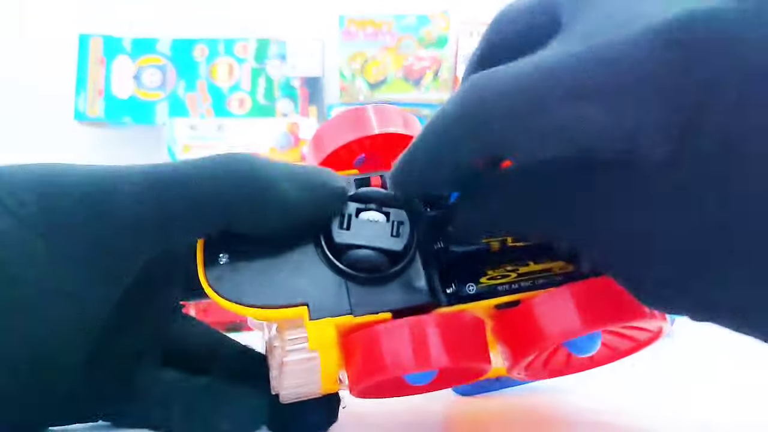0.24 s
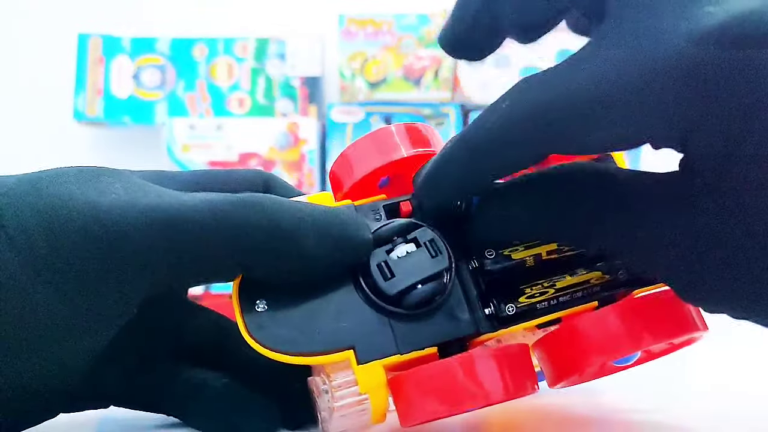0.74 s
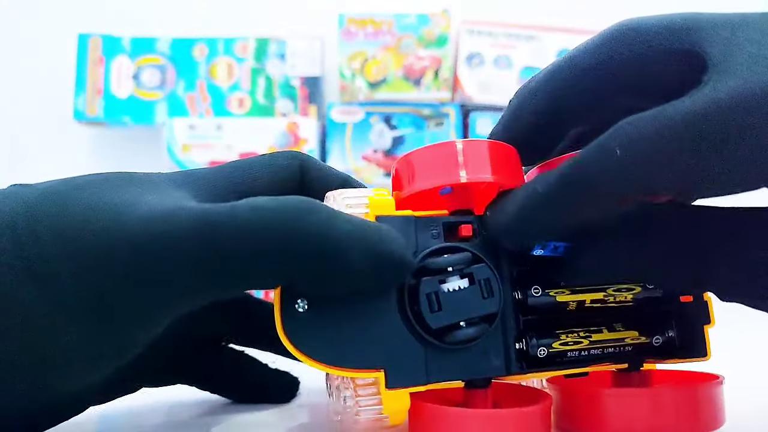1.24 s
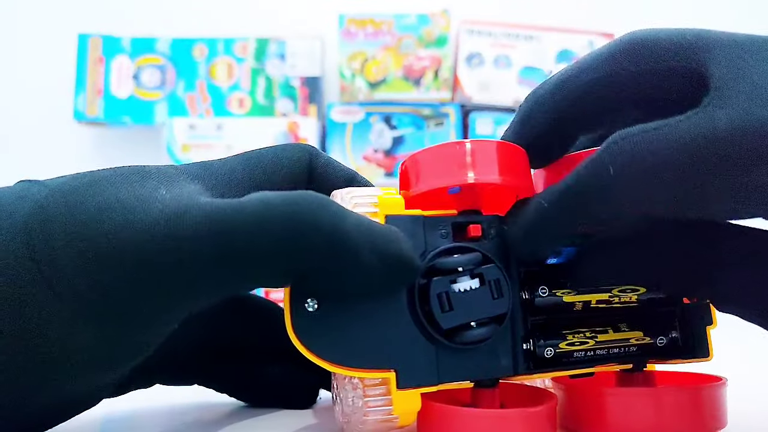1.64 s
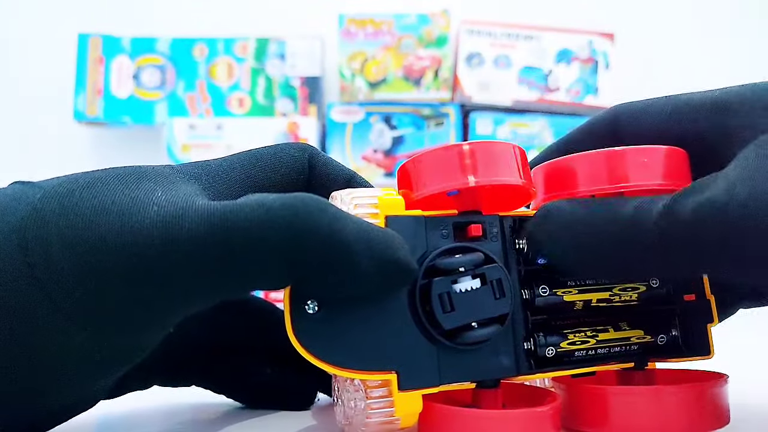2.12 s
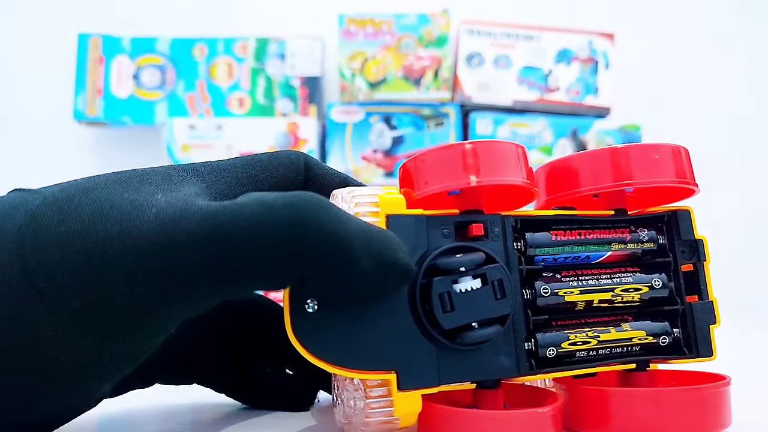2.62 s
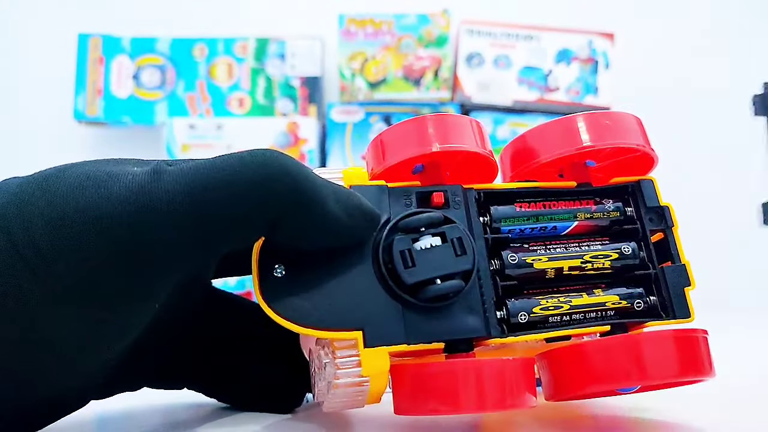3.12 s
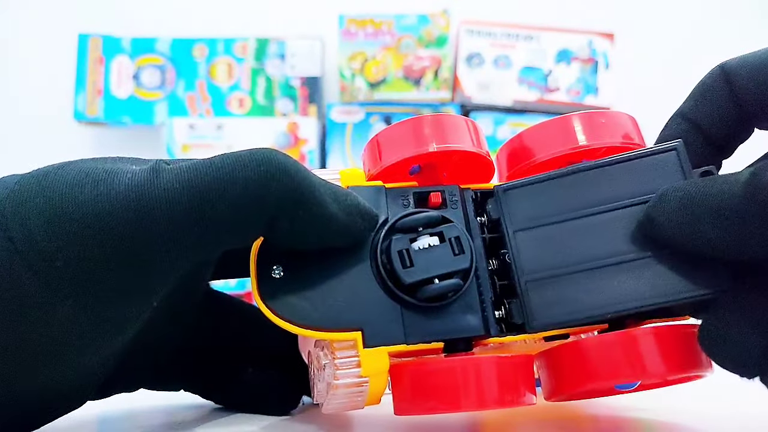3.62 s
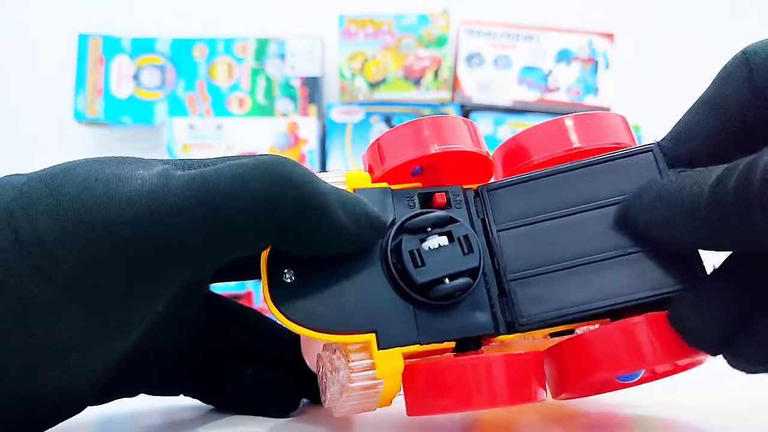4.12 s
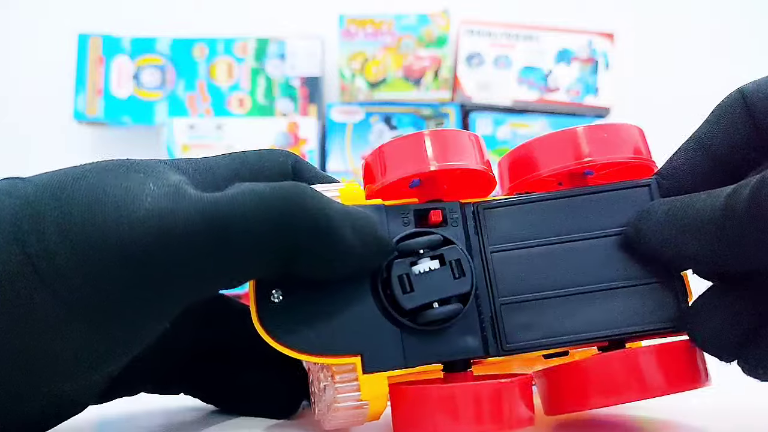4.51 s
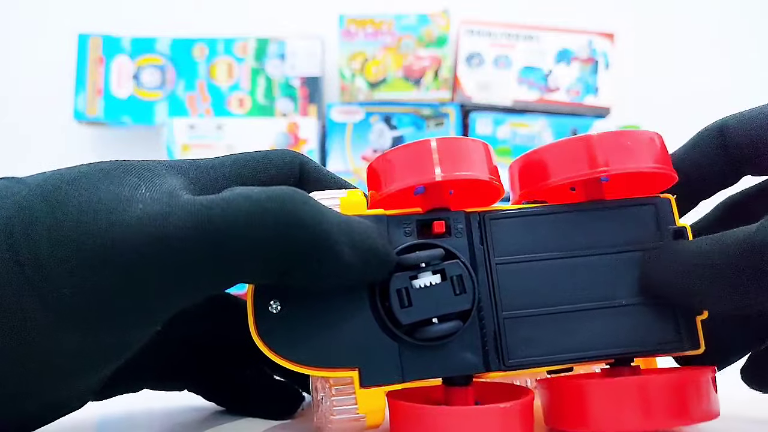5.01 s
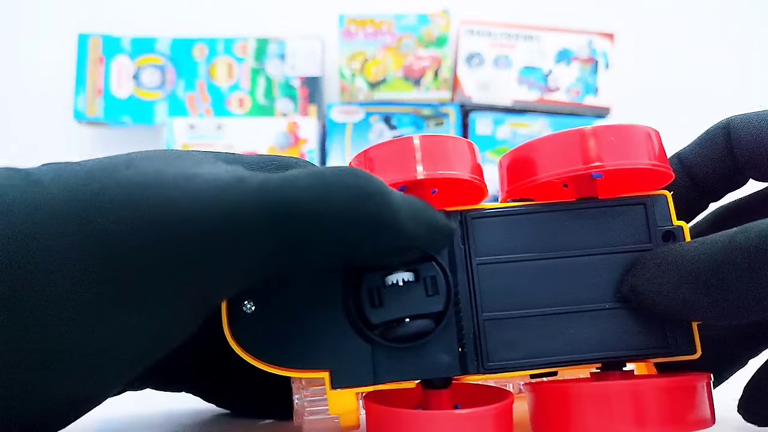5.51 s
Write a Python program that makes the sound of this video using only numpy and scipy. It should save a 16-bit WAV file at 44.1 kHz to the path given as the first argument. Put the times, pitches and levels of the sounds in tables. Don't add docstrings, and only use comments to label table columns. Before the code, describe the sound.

Close stereo sound of gloved hands fitting a battery into a hollow plastic toy, over quiet hiss and a faint wavering low hum. Soft fabric rubbing and lumpy low air puffs run throughout. A small clip click comes at 0.2 s, then a clattering knock with a low table thud at 0.72. Hollow knocks follow at 1.6, a bright metallic tick at 1.76 and another knock at 1.9. At 2.27 the battery seats with a very loud, bright, slightly clipped snap and a low thud. Duller clicks come around 2.5 and a crisp double click with a bump at 2.8. After a near pause, light cover taps begin at 3.5; a short gritty squeak slides around 4.2 and ends in a drop-in knock at 4.3. Small taps and a click at 4.7 lead to a loud, sharp latch snap at 5.15, with short room echo. Faint taps and rustle end it by 5.8.

```python
import sys
import numpy as np
from scipy import signal
from scipy.fft import rfft, irfft, next_fast_len
from scipy.io import wavfile
from scipy.ndimage import uniform_filter1d

SR = 44100
rng = np.random.default_rng(int(sys.argv[2]) if len(sys.argv) > 2 else 0)


def amplitude_ratio(level_db):
    exponent = np.asarray(level_db, float) / 20
    return 10 ** exponent


def to_wav(sig):
    pcm = np.clip(np.atleast_2d(sig), -1, 1) * 32767
    pcm = np.round(pcm).astype(np.int16)
    wavfile.write(sys.argv[1], SR, pcm.T)


N = 253737


def evened(x):
    return x / np.sqrt(np.mean(x ** 2) + 1e-20)


def read_curve(points, hz):
    f, value = np.transpose(points)
    return np.interp(np.log(hz + 1), np.log(f + 1), value)


def add(mix, s, sound):
    part = mix[:, round(s * SR):][:, :sound.shape[1]]
    part += sound[:, :part.shape[1]]


def band(x, lo_hz, hi_hz, order=2):
    sos = signal.butter(order, [lo_hz, min(hi_hz, .45 * SR)], "band", fs=SR, output="sos")
    return signal.sosfilt(sos, x)


def passes(hz, lo_hz, hi_hz):
    return 1 / np.sqrt(1 + ((hz ** 2 - lo_hz * hi_hz) / ((hz + 1) * (hi_hz - lo_hz))) ** 4)


def noise(spectrum, same, patchy_db):
    frames, hz = N // 256 + 5, np.fft.rfftfreq(1024, 1 / SR)
    a, b, c, d, patches = rng.standard_normal((frames, 513, 5)).T
    patches = uniform_filter1d(patches, size=14, axis=0)
    patches = evened(uniform_filter1d(patches, size=8, axis=1))
    same = np.clip(read_curve(same, hz), -1, 1)[:, None]
    left = a + 1j * b
    right = same * left + np.sqrt(1 - same ** 2) * (c + 1j * d)
    z = np.array([left, right]) * amplitude_ratio(read_curve(spectrum, hz)[:, None] + patchy_db * patches)
    return evened(signal.istft(z, nperseg=1024, noverlap=768)[1][:, :N])


def swell(s, rise_s, fall_s):
    since = np.arange(0, N / SR + .002, .001) - s
    return amplitude_ratio(10 * np.where(since < 0, since / abs(rise_s), -since / abs(fall_s)))


def piled(levels_db, shapes, rest_db):
    power = amplitude_ratio(rest_db) ** 2 + sum((amplitude_ratio(db) * shape) ** 2 for db, shape in zip(levels_db, shapes))
    return np.interp(np.arange(N) / SR * 1000, np.arange(len(power)), np.sqrt(power))


def room_tone():
    # (frequency [Hz], level per Hz [dB])
    hiss_colour = [(76, -28.5), (130, -19.5), (155, -24), (250, -16), (437, -10), (522, -14.5), (1650, -25),
                   (2100, -32.5), (3250, -36), (6910, -43.5), (9130, -45.5), (13900, -41), (15000, -56.5)]
    # (frequency [Hz], likeness [0-1])
    hiss_likeness = [(60, 0.22), (240, 1), (950, 0.12), (3770, 0.05), (15000, 0.02)]
    hum_hz, hum_db, waver = 100, -48, 0.38
    blur = evened(band(rng.standard_normal(N), hum_hz - 11, hum_hz + 11))
    hum = np.sqrt(2) * np.sin(2 * np.pi * hum_hz * np.arange(N) / SR) + waver * blur
    hiss = amplitude_ratio(-57) * noise(hiss_colour, hiss_likeness, patchy_db=3.0)
    return hiss + amplitude_ratio(hum_db + np.array([[-1.5], [-.4]])) * hum


def air():
    # (time [s], level [dB], time to fade 10 dB [s], left-right [dB])
    gust_rows = [(0.0, -33.5, 0.2622, -11), (.19, -37.5, 0.1051, -12.5), (.36, -38, 0.0398, -14.5),
                 (.8, -39, 0.42, 1.5), (1.06, -40, 0.16, -7), (1.26, -32.5, 0.27, -4.5),
                 (1.46, -35.5, -0.0122, -19.5), (1.62, -37, 0.17, -7), (1.71, -39, 0.0241, -22),
                 (1.819, -30, 0.01, -20), (2.071, -37.5, 0.1759, -12.5), (2.18, -43, 0.6, 1),
                 (2.43, -42, 0.1, -6.5), (2.67, -37, 0.18, -11.5), (2.8, -43, 0.3, 6),
                 (2.98, -42.5, 0.3, -4.5), (3.31, -40, 0.2322, -7.5), (3.46, -47, 0.329, -8),
                 (3.65, -34, 0.12, -19), (3.94, -35, 0.16, -12.5), (4.159, -37.5, -0.1, -22.5),
                 (4.36, -40, 0.14, -12.5), (4.79, -41, 0.32, 0), (5.3, -43, 1.5, 2)]
    # (time [s], level [dB], time to fade 10 dB [s])
    jolt_rows = [
        (.74, -23, 0.08),
        (1.75, -34.5, -3),
        (2.48, -28.5, -0.57),
        (2.811, -14.5, -0.03),
        (4.14, -29, -0.12),
        (4.31, -39.5, 1),
        (5.11, -34, -0.4),
    ]
    shapes = [swell(s, 0.7 * fade_s, fade_s) for s, _, fade_s, _ in gust_rows]
    gusts = np.array([piled([db + side * pan_db for _, db, _, pan_db in gust_rows], shapes, -54.5)
                      for side in (.5, -.5)])
    jolt_shapes = [swell(s, 0.012, fade_s) for s, _, fade_s in jolt_rows]
    jolts = piled([db for _, db, _ in jolt_rows], jolt_shapes, -59.5)
    a, b, lumps = rng.standard_normal((3, N))
    lumpy = amplitude_ratio(3.777 * evened(band(lumps, 8.1, 58, order=1)))
    push = np.array([0.27 * b + a, b]) * lumpy
    low = np.array([evened(band(push[0], 3.8, 59.0)), evened(band(push[1], 21, 65.7))])
    upper = amplitude_ratio(-16.5) * evened(band(push, 51.0, 223))
    return amplitude_ratio(-4.0) * (gusts * low + (amplitude_ratio(-26.5) * gusts + jolts) * upper)


def gloves():
    # (most pressure [s], rise [s], fall [s],
    # rub [dB], fizz [dB])
    strokes = [(0.0, 0.0499, 0.326, -56.5, -68), (.227, 0.0323, 0.071, -46.5, -80.5),
               (.476, 0.0983, 0.042, -54, -67.5), (.672, .03, .04, -60, -59),
               (.701, 0.051, 0.2, -46, -56.5), (.93, 0.107, 0.095, -54, -67),
               (1.31, 0.2012, 0.084, -53.5, -63), (1.5, 0.024, 0.3053, -53.5, -70.5),
               (1.898, 0.2198, 0.109, -53.5, -58.5), (2.113, 0.1742, 0.19, -57, -63.5),
               (2.377, 0.2068, 0.167, -44.5, -57.5), (2.575, 0.2341, 0.041, -49.5, -55),
               (2.606, 0.062, .01, -52.5, -53), (2.821, 0.0273, 0.12, -46.5, -52),
               (2.955, 0.117, .02, -59.5, -59.5),
               (3.265, 0.089, 0.047, -68, -64), (3.455, 0.0296, 0.033, -67.5, -67.5),
               (3.549, 0.0365, 0.05, -51.5, -67.5), (3.639, 0.058, 0.024, -50, -66),
               (3.844, 0.0982, 0.02604, -50.5, -67.5), (4.173, 0.04306, 0.0533, -45.5, -50),
               (4.328, 0.03, 0.035, -45.5, -64.5), (4.447, 0.022, 0.047, -51, -73),
               (4.717, 0.136, 0.041, -50.5, -65), (4.901, 0.096, 0.11, -47.5, -65),
               (5.081, 0.16, 0.043, -54, -56), (5.261, 0.1963, 0.139, -47.5, -59.5),
               (5.49, 0.092, 0.094, -55, -64.5), (5.73, 0.25, 0.202, -59, -66.5)]
    # (frequency [Hz], level per Hz [dB])
    rub_colour = [(240, -39), (400, 0.5), (615, -0.5), (990, -2.5), (1650, -13.5), (1950, -2), (2560, -17),
                  (6000, -32.5), (7800, -57.5), (13200, -120)]
    # (frequency [Hz], level per Hz [dB])
    fizz_colour = [(1470, -31.5), (2500, 0), (4450, -3), (4980, -5), (7190, -2.5), (8810, -11), (13700, -9),
                   (14700, -34), (15000, -48.5)]
    s, rise_s, fall_s, rub_db, fizz_db = np.transpose(strokes)
    shapes = [swell(*row) for row in zip(s, rise_s, fall_s)]
    grain = amplitude_ratio(1.5 * evened(uniform_filter1d(rng.standard_normal(N), size=130)))
    rub = piled(rub_db, shapes, -72) * noise(rub_colour, [(400, 0.7), (4000, 0.56)], patchy_db=0.2)
    fizz = piled(fizz_db, shapes, -74.5) * noise(fizz_colour, [(3000, 0.15), (12000, 0.11)], patchy_db=3.5)
    return grain * (amplitude_ratio(-6.0) * rub + amplitude_ratio(0.5) * fizz)


def puffs():
    # (time [s], level [dB], half-width [s])
    puff_rows = [
        (0.077, -16, 0.00266),
        (1.275, -18, 0.005406),
        (1.708, -15.5, 0.0026),
        (3.685, -16, 0.0023),
        (3.735, -24, 0.00105),
        (3.837, -15.5, 0.00356),
        (4.135, -22.5, 0.0038),
    ]
    out, t = np.zeros((2, N)), np.arange(-1500, 1500) / SR
    for s, db, half_s in puff_rows:
        push = np.exp(-(t / half_s) ** 2) - 0.29 * np.exp(-(t / (2.5 * half_s)) ** 2)
        add(out, s + t[0], amplitude_ratio(db + np.array([[-14], [0]])) * push)
    return out


def knock(modes, chatter_s, build_s, crack_db, tick_db, spread, flip_hz=0):
    # (frequency [Hz], level per Hz [dB])
    contact_colour = [(1180, -30), (2000, 5), (2320, 2), (4180, -4.5), (4440, -5), (4980, -7), (7070, -3),
                      (8200, -11), (9600, -19), (11000, -13), (12900, -11.5), (14300, -15.5), (15000, -34)]
    t = np.arange(2048) / SR
    since = t - t[265]
    hz, db, t60, pan_db = np.transpose(modes)[:, :, None]
    apart = rng.uniform(-np.pi, np.pi, (len(modes), 1)) * np.clip(hz / 2200, 0, 1) * spread
    shared, *grit = rng.standard_normal((3, 2048))
    force = shared * np.exp(np.where(since < 0, since / (build_s + 1e-7), -since / (chatter_s + 1e-7)))

    growth = (1 - np.exp(-t * hz / 0.27)) ** 2
    ringing = growth * amplitude_ratio(-60 * t / t60) * np.exp(2j * np.pi * hz * t)
    driven = signal.fftconvolve(ringing, force[None], axes=1)[:, :2048]
    driven *= amplitude_ratio(db) / abs(driven).max(axis=1, keepdims=True)
    driven *= np.where(hz < flip_hz, -1, 1)
    rings = np.array([(driven * np.exp(1j * side * apart) * amplitude_ratio(-side * pan_db)).imag.sum(0)
                      for side in (-.5, .5)])
    rings = band(rings, 441.5, 17000, order=3)

    bins = np.fft.rfftfreq(2048, 1 / SR)
    grit = rfft(np.array(grit)) * amplitude_ratio(read_curve(contact_colour, bins))
    fade = -since / (0.54 * chatter_s + 0.0013)
    linger = np.exp(np.where(since < 0, since / (build_s + 0.00016), fade))
    crack = amplitude_ratio(crack_db + 2.5) * evened(irfft(grit * passes(bins, lo_hz=2400, hi_hz=6150)))
    tick = amplitude_ratio(tick_db + 4.5) * evened(irfft(grit * passes(bins, lo_hz=6000, hi_hz=14020)))
    return rings / abs(rings).max() + linger * (crack + tick)


def knocks(touches):
    # (frequency [Hz], level [dB], time to fade 60 dB [s])
    shell_rings = [(549.35, -13, 0.019), (700, -11.5, 0.0099), (920, -1.5, 0.013), (1300, -2.5, 0.015),
                   (1560, -1.5, 0.0025), (2100, -8, 0.025), (2590, -11, 0.013)]
    out = np.zeros((2, N))
    for s, db, hz, crack_db, tick_db, chatter_s, ring_s, shell_db, wide_db in touches:
        shift, uneven, pan = rng.uniform(-1, 1, (3, len(shell_rings)))
        modes = [(hz, 0, ring_s, 0)]
        for (f, d, t60), a, b, p in zip(shell_rings, shift, uneven, pan):
            ring_db = d + 1.2 * b + shell_db - 4.5 * abs(np.log2(f / hz))
            modes.append((f * (1 + 0.083 * a), ring_db, t60, 3.6 * p))
        sound = knock(modes, chatter_s, 0.12 * chatter_s, crack_db, tick_db, spread=0.75)
        add(out, s - .0055, amplitude_ratio(db + wide_db * pan[0] * np.array([[1], [-1]])) * sound)
    return out


def taps():
    # (time [s], peak [dB], strongest ring [Hz], crack [dB])
    nudges = [(.077, -41, 1374, -27), (.682, -39, 980, -16), (.738, -33.5, 1420, -17),
              (.918, -35, 700, -12), (1.149, -45.5, 1010, -26), (1.27, -52.5, 962.8, -18.5),
              (1.64, -39, 902.4, -25.5), (2.129, -35, 951.7, -37.5), (2.246, -33, 1110, -34),
              (2.921, -45.5, 1500, -3.5), (3.451, -44.5, 682, -18), (3.525, -50, 803, -13.5),
              (3.636, -40.5, 850, -16.5), (4.311, -40.5, 1300, -16.5), (4.672, -42, 899.1, -14),
              (4.919, -34, 924, -33.5)]
    # (time [s], peak [dB], strongest ring [Hz], crack [dB], tick [dB])
    heavy = [
        (0.724, -28, 523.4, -15, -15.5),
        (2.039, -38.5, 3334, -13.5, -15),
        (2.208, -35.5, 707.3, -9.5, -24),
        (4.326, -29.5, 990, -20, -30),
        (5.027, -39, 785.4, -12.5, -20.5),
        (5.076, -36.5, 932.1, -11, -28.5),
        (5.559, -37, 1050, -38.5, -33),
    ]
    # (time [s], peak [dB], strongest ring [Hz], crack [dB], tick [dB])
    battery_taps = [(1.328, -36, 1044, -25.5, -25.5), (1.484, -49, 833.8, -4.5, -12),
                    (1.506, -45, 874.4, -10, -14), (1.874, -46, 1500, -2, -19.5),
                    (2.187, -29, 1820, -25, -32), (2.442, -33.5, 1080, -15, -28.5),
                    (2.571, -36.5, 1035, -8, -6), (2.824, -36, 641.7, -17, -27.5)]
    # (time [s], peak [dB], strongest ring [Hz], crack [dB], tick [dB])
    cover_taps = [(3.744, -41, 2241, -15.5, -37), (3.808, -39, 866.5, -33, -42.5),
                  (3.985, -49, 980.4, -4, -8), (4.446, -41, 1300, -15, -21), (4.759, -40, 836, -27.5, -33),
                  (4.829, -43.5, 1304, -9.5, -11.5), (4.883, -41, 1915, -9, -17),
                  (4.905, -33.5, 1931, -15, -16), (4.955, -41, 923.8, -22, -22),
                  (5.428, -38.5, 730, -18.5, -20)]
    # (time [s], peak [dB], strongest ring [Hz], crack [dB])
    catches = [
        (5.151, -19.5, 2100, -15),
        (2.2688, -26, 1300, -11.5),
        (4.33, -32.5, 713.86, -20),
    ]
    # (time [s], peak [dB], strongest ring [Hz], crack [dB])
    wheels = [
        (5.691, -47, 1158, -35.5),
        (5.72, -46.5, 1300, -28),
    ]
    rows = []
    for table, chatter_s in ((battery_taps, 0.0019), (cover_taps, 0.0012), (heavy, 0.0023)):
        rows += [(*row, chatter_s) for row in table]
    for table, chatter_s in ((nudges, 0.0076), (wheels, 0.029), (catches, 0.0063)):
        rows += [(*row, row[-1] - 12.5, chatter_s) for row in table]
    return [(*row, 0.0099 + 1.9 * row[-1], 2.5, 4.5) for row in rows]


def blows():
    # (time [s], peak [dB], ring [Hz], time to fade 60 dB [s], crack [dB])
    shell_blows = [(.7191, -16.5, 2070, 0.0042, -11.5), (.7215, -16.5, 1360, 0.03, -20),
                   (.7305, -25.5, 835, 0.022, -16), (1.6033, -22, 2100, 0.01, -15),
                   (1.6202, -24.5, 1190, 0.01236, -26), (1.649, -19.5, 1458, 0.0117, -19),
                   (1.8885, -24, 939, 0.04, -19.5), (2.476, -24.5, 942.8, 0.02436, -18),
                   (2.516, -23, 945, 0.02378, -11), (3.5362, -30, 1393, 0.035, -28),
                   (3.5392, -28.5, 1384, 0.03264, -26), (3.542, -29.5, 890, 0.031, -28),
                   (4.1842, -33, 1918, 0.0195, -26), (4.2006, -28, 2423, 0.007, -19),
                   (4.2046, -25.5, 1977, 0.022, -23), (4.7045, -32.5, 908, .015, -26),
                   (4.7105, -29.5, 940.5, 0.03, -24.5), (4.7252, -28, 1500, 0.011, -26.5),
                   (5.1715, -27, 680, 0.04714, -36.5), (5.231, -34.5, 675.5, 0.0508, -36)]
    # (time [s], peak [dB], ring [Hz], time to fade 60 dB [s], crack [dB])
    pings = [
        (1.7603, -16.5, 1440, 0.013, -24),
        (1.7606, -27, 3600, .011, -22),
        (1.7605, -24, 5400, .011, -20),
        (2.2708, -13, 1300, 0.01068, -14),
    ]
    # (time [s], peak [dB], ring [Hz], time to fade 60 dB [s], crack [dB])
    clips = [(2.4797, -28, 4200, .004, -8), (4.703, -33.5, 2600, .01, -12),
             (4.7075, -21.5, 4900, .006, -19), (.2155, -30, 2400, 0.0128, -12),
             (.216, -34, 7360, .008, -19), (.2175, -30, 1049, .045, -26), (.7145, -37, 5150, .008, -8),
             (.7245, -23.5, 1600, .025, -14), (2.787, -38.5, 2550, .012, -7.5),
             (2.797, -40, 2600, 0.022, -18), (2.8092, -25, 4250, .005, -5.5),
             (2.8105, -28, 1700, 0.0094, -11.5), (2.812, -28.5, 749, 0.016, -12.5),
             (2.822, -30.5, 4000, .006, -6.5), (2.823, -33, 2700, .012, -14.5),
             (3.5443, -29.5, 1700, .008, -23.5), (4.172, -32, 2500, .015, -15.5),
             (4.194, -30, 2290, .012, -18), (5.4278, -33.5, 2300, .012, -18.5)]
    rows = []
    for table, tick_db in ((shell_blows, -10.5), (pings, 1), (clips, -9)):
        for s, db, hz, ring_s, crack_db in table:
            rows.append((s, db, hz, crack_db, crack_db + tick_db, .0004, ring_s, -1.5, 1.5))
    return rows


def rattles():
    # (time [s], peak [dB], ring [Hz], time to fade 60 dB [s], crack [dB])
    rattle_rows = [(.7195, -28, 2730, .012, -16), (.7218, -23, 2110, 0.023, -20),
                   (.722, -25, 1060, 0.0287, -26), (.733, -35.5, 3900, .015, -15),
                   (.762, -36, 1920, .02, -20), (1.6036, -24, 2976, 0.0084, -21),
                   (1.6031, -23, 1400, .012, -27), (1.6205, -30, 1450, .016, -25.5),
                   (1.6206, -37, 2100, .016, -19), (1.6492, -23, 1800, .013, -14),
                   (1.6496, -33, 6000, .008, -14), (1.7604, -29, 10500, .006, -18),
                   (2.0395, -42, 3350, .05, -20), (4.2224, -41, 2500, .008, -13.5),
                   (4.3232, -21, 1366, 0.016, -19.5), (4.354, -47, 2300, .01, -14),
                   (4.434, -46, 2400, .012, -9), (4.4895, -45.5, 2500, .012, -15),
                   (4.56, -56.5, 5500, 0.0056, -7), (4.6517, -43.5, 2210, .015, -14),
                   (4.6725, -41, 2600, .012, -14), (4.77, -49, 2500, 0.014, -20),
                   (4.935, -47, 2200, .01, -13.5), (4.965, -48, 2500, .01, -12),
                   (2.477, -32, 1500, .012, -15.5), (2.5161, -30.5, 1585, .012, -16),
                   (2.139, -36, 1450, .03, -22), (1.8889, -33, 1500, .012, -15),
                   (2.475, -36, 1100, .01, -8), (2.5223, -34, 1900, 0.011, -18),
                   (2.525, -33.5, 700, 0.021, -26), (3.5365, -34.5, 2050, .012, -16),
                   (3.557, -48, 2900, .015, -16), (3.629, -45, 2400, 0.011, -9),
                   (.7235, -27, 690, .04, -30), (4.2078, -30, 2490, .01, -19),
                   (4.331, -32.5, 990, 0.017, -24)]
    return [(s, db, hz, crack_db, crack_db - 10.5, .0004, ring_s, -9, 1.5)
            for s, db, hz, ring_s, crack_db in rattle_rows]


def thuds():
    # (time [s], level [dB], frequency [Hz], time to fade 60 dB [s])
    thud_rows = [
        (.722, -28, 108, 0.4966),
        (2.812, -36.5, 130, 0.37),
        (0.17, -59, 208.46, 0.1367),
        (2.275, -32, 99, 0.34),
        (2.812, -36, 255, 0.067),
    ]
    out, t = np.zeros((2, N)), np.arange(SR // 2) / SR
    for s, db, hz, t60 in thud_rows:
        ring = np.sin(2 * np.pi * hz * t)
        ring += 0.77 * np.sin(2 * np.pi * 1.22 * hz * t)
        ring += 0.3 * np.sin(2 * np.pi * 1.7 * hz * t)
        add(out, s, amplitude_ratio(db - 60 * t / t60) * ring * amplitude_ratio([[-1.5], [1.5]]))
    return out


def snaps():
    # (time [s], peak [dB], crack 2.5-6 kHz [dB], tick 6-14 kHz [dB], left-right phase spread [share])
    snap_rows = [
        (2.2728, 2.5, -26, -22, 0.56),
        (5.1534, 2.5, -28, -32, 0.4),
    ]
    # (frequency [Hz], level [dB], time to fade 60 dB [s], left-right [dB])
    bay_rings = [(631.84, -11, .02, 2.5), (859, -1.5, 0.020247, 0), (1329, 0.5, 0.016, -4),
                 (1500, -0.5, 0.017, 2.5), (2700, -11.5, 0.012, -3.5), (3020, -5.5, 0.014, -3.5),
                 (3650, -7, 0.016, -3), (4110, -6, 0.011, -9), (7130, -9.5, 0.009, -10),
                 (8899.7, -16, 0.0096, -9.5), (10300, -11, .007, -8), (11197, -4, 0.0051, -12),
                 (13650, -10, .005, 0), (2080, -13, .012, 0)]
    # (frequency [Hz], level [dB], time to fade 60 dB [s], left-right [dB])
    cover_rings = [(685, -0.5, 0.022074, 0), (803, -6, 0.029, -0.5), (1544, 2.5, 0.012052, -11.5),
                   (2103, 5.5, 0.009, 17), (2737.3, -4.5, 0.014, 11), (3421.6, -8.5, 0.017, -3.5),
                   (5570, -17, 0.02, 2.5), (6600, -13, 0.012, -4), (10500, -28, 0.0055, -4),
                   (13000, -25.5, .005, 0), (14800, -34, .004, -0.5)]
    out = np.zeros((2, N))
    for row, modes, flip_hz in zip(snap_rows, (bay_rings, cover_rings), (1100, 0)):
        s, db, crack_db, tick_db, spread = row
        add(out, s - .006, amplitude_ratio(db) * knock(modes, 0, 0, crack_db, tick_db, spread, flip_hz))
    return out


def scrape():
    # (time [s], pressure [dB], ring [Hz])
    scrape_path = [
        (3.75, -57.5, 2100),
        (3.85, -64.5, 1987),
        (3.9, -76, 1987),
        (4.06, -58.5, 1938),
        (4.13, -60, 1992),
        (4.165, -42, 1920),
        (4.21, -35.5, 1987),
        (4.222, -57.5, 2038),
        (4.31, -63, 1930),
    ]
    t = np.arange(N) / SR
    s, pressure_db, ring_hz = np.transpose(scrape_path)
    db, hz = np.interp(t, s, pressure_db), np.interp(t, s, ring_hz)
    touching = np.interp(t, [3.73, 3.75, 4.3, 4.32], [0, 1, 1, 0])
    slips = rng.standard_normal((2, N)) * (0.7163 + (rng.random(N) < 900 / SR) * 1.891)
    slips = slips + 0.329 * slips[::-1]
    turn = np.exp(2j * np.pi * np.cumsum(hz) / SR)
    r, thin = np.exp(-np.pi * 330 / SR), np.exp(-np.pi * 90 / SR)
    ring = (turn * signal.lfilter([1], np.convolve([1, -r], [1, -r]), slips / turn)).real
    sing = evened((turn * signal.lfilter([1], [1, -thin], ring / turn)).real)
    sing *= piled([-62], [swell(4.292, 0.13, .012)], -100)
    upper_gain = amplitude_ratio(db - 22.5) + piled([-41.5], [swell(4.152, 0.0119, 0.021)], -100)
    upper = upper_gain * amplitude_ratio(-5.5) * evened(band(slips, 3798, 5153.6))
    grit = amplitude_ratio(1.2 * (db + 35.0) - 40.5) * evened(band(slips, 2266, 2670.0))
    return touching * (grit + sing + amplitude_ratio(db - 3.0) * evened(ring) + upper)


def scattered(x):
    # (shift [Hz], level [dB])
    shifts = [(-310, -8), (310, -8.5), (729.5, -19), (1500, -15)]
    size = next_fast_len(N)
    high = rfft(band(x, 1750, 8300, order=3), size)
    copies = sum(amplitude_ratio(db) * np.roll(high, round(hz * size / SR), axis=1) for hz, db in shifts)
    return x + irfft(copies, size)[:, :N]


def walls(x):
    # (frequency [Hz], time to fade 60 dB [s])
    wall_fade = [(300, 0.9219), (700, 0.335), (1500, 0.61), (4000, 0.43), (10000, 0.23)]
    # (frequency [Hz], level [dB])
    wall_colour = [(300, 1.5), (700, 6.5), (1100, -5.5), (1500, -5), (2200, -8), (2800, -9), (3700, -5),
                   (5000, -4), (7000, -1), (13500, -3.5)]
    taps_in = np.zeros((2, SR))
    at = np.arange(0, SR - 20, 20) + rng.integers(0, 20, (2, (SR - 1) // 20))
    np.put_along_axis(taps_in, at, rng.choice([-1., 1.], at.shape), 1)
    hz, t, z = signal.stft(taps_in, SR, nperseg=256)
    fade_db = read_curve(wall_colour, hz)[:, None] - 60 * t / read_curve(wall_fade, hz)[:, None]
    tail = signal.istft(z * amplitude_ratio(fade_db), SR, nperseg=256)[1][:, :SR]
    first_wall_s = 0.01286
    tail *= np.clip((np.arange(SR) / SR - first_wall_s) / 0.0011, .2, 1)
    tail += 0.18 * tail[::-1]
    return signal.fftconvolve(x, tail / np.linalg.norm(tail[0]), axes=1)[:, :N]


def scene():
    near = knocks(taps() + blows() + rattles()) + snaps() + scrape()
    echo = amplitude_ratio(-16.5) * walls(scattered(near))
    steady = echo + room_tone() + air() + gloves() + puffs() + thuds()
    edge = signal.firwin(511, 14400, window=("kaiser", 8), fs=SR)  # low-pass, Hz
    return near + signal.oaconvolve(steady, edge[None], "same", axes=1)


def top_cut(x):
    return signal.sosfilt(signal.butter(12, 16200, fs=SR, output="sos"), x)


def record(dry):
    mix = np.clip(dry, -1, 1)
    return top_cut(mix)


dry = scene()
out = record(dry)
to_wav(out)
```